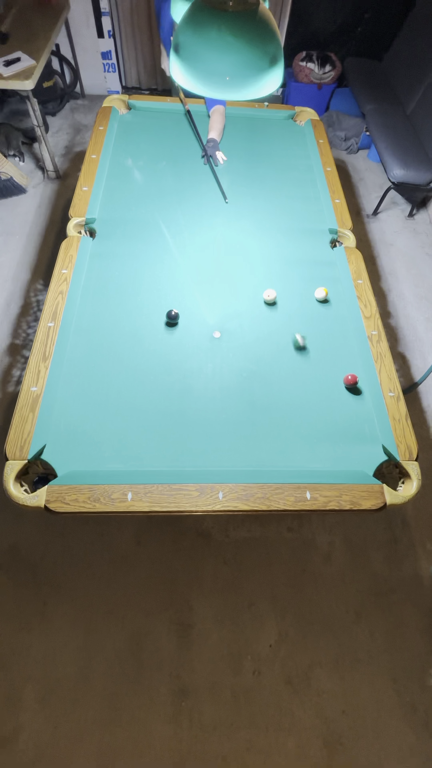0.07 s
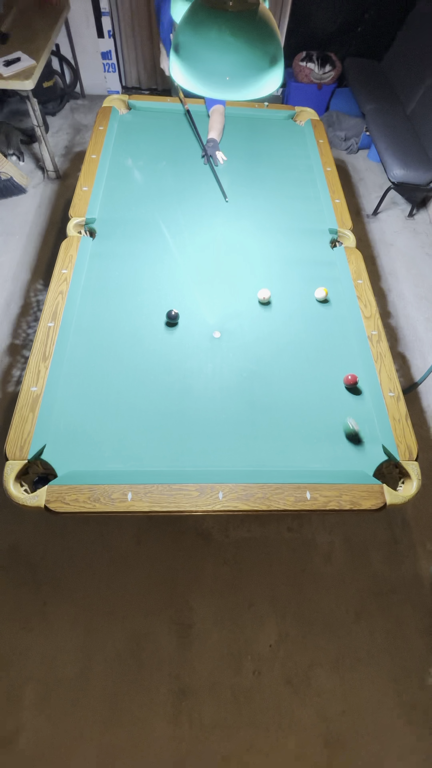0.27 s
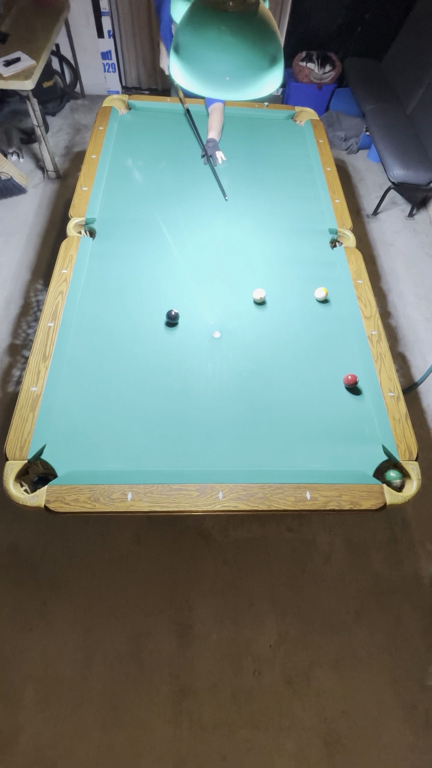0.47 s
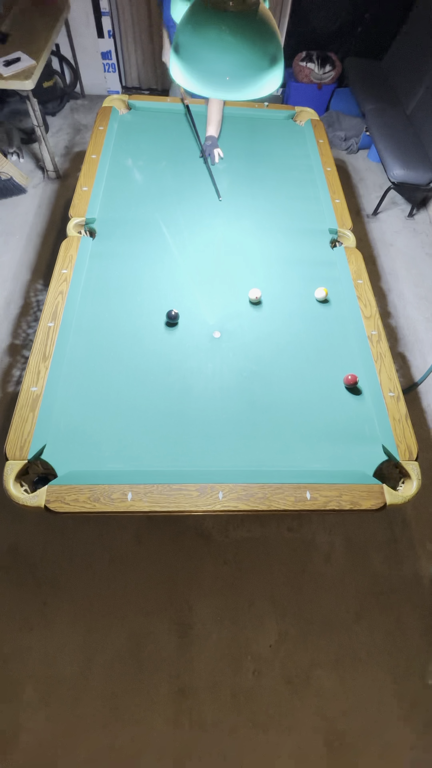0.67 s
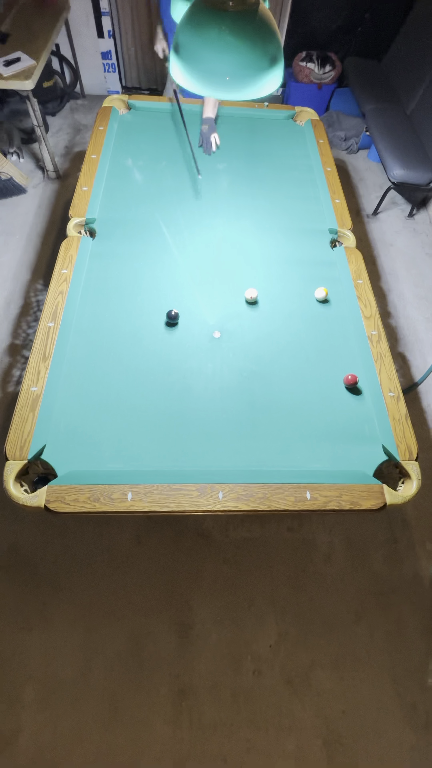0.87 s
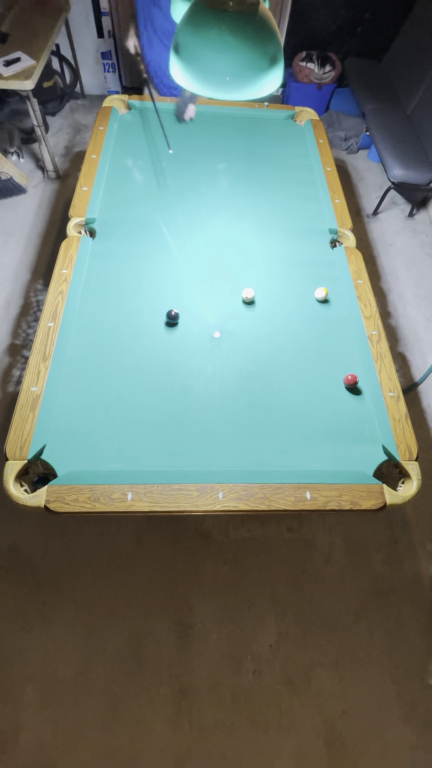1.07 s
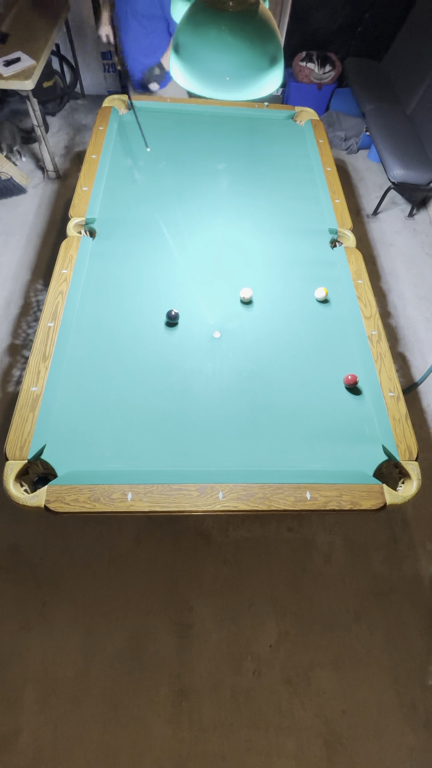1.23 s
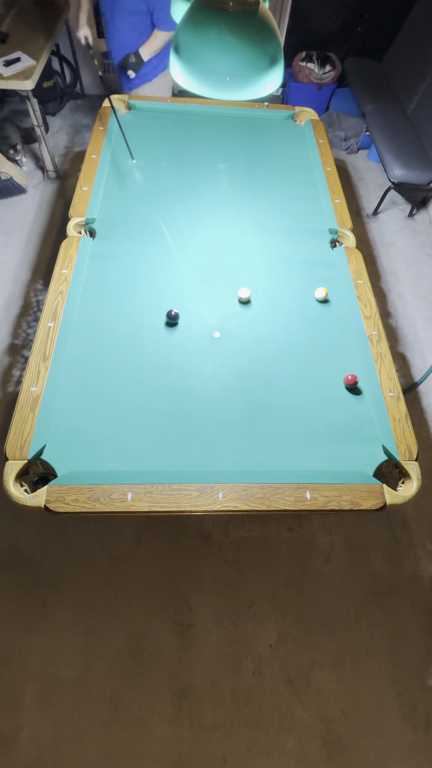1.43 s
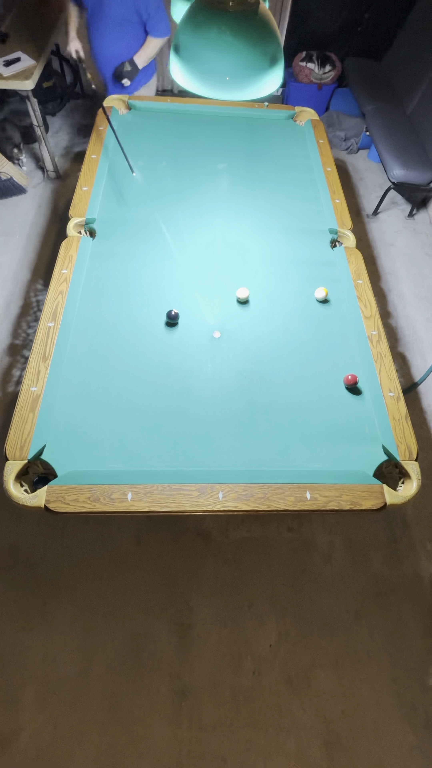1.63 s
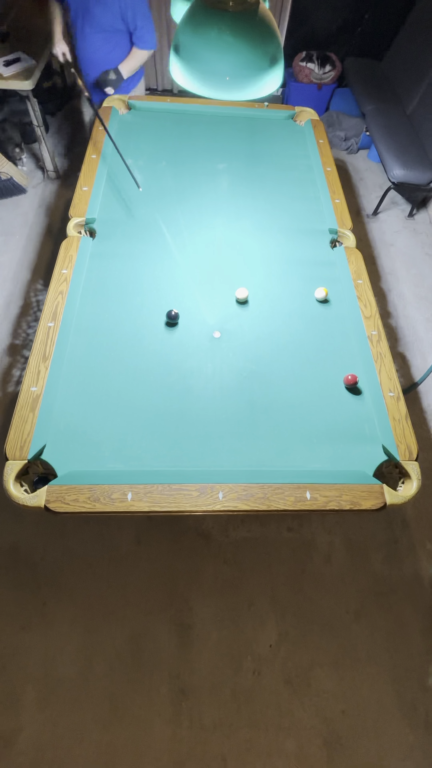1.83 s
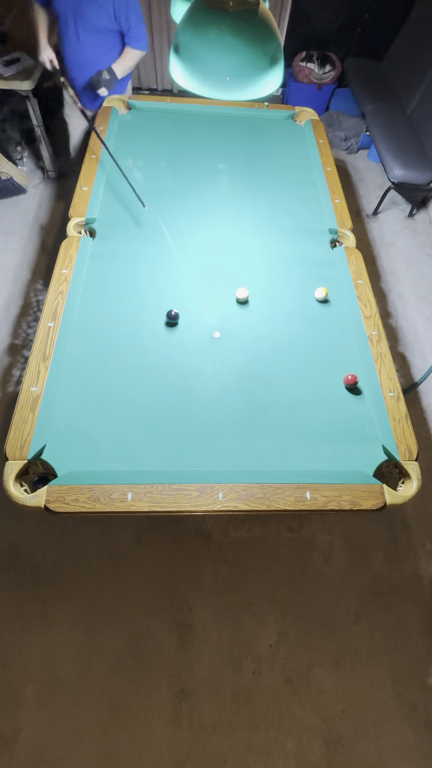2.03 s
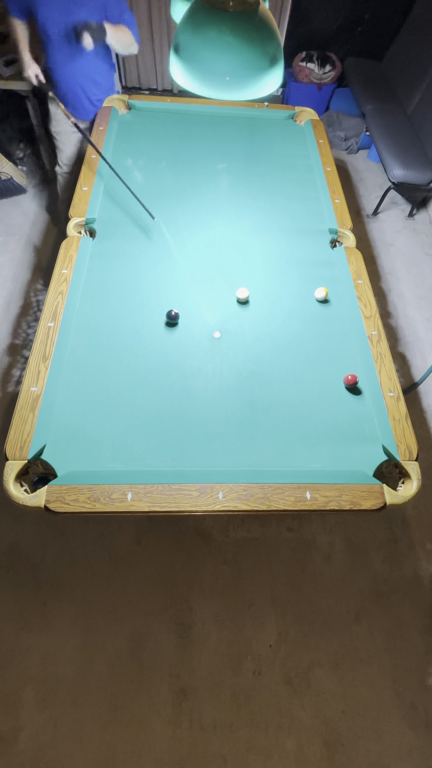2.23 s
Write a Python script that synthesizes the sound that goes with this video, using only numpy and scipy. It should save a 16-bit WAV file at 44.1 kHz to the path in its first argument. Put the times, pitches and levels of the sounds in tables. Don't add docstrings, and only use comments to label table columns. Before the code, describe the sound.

A pool shot in a small hard room, heard from a phone above the table: a loud sharp ball click, brief roll on cloth, hollow pocket knocks, lighter ball taps, booming table frame, then faint footfalls and scuffs.

```python
import sys
import numpy as np
from scipy import signal
from scipy.fft import rfft, irfft
from scipy.io import wavfile
from scipy.ndimage import uniform_filter1d

SR = 44100
rng = np.random.default_rng(int(sys.argv[2]) if len(sys.argv) > 2 else 0)


def decibels_to_gain(level_db):
    exponent = np.asarray(level_db, float) / 20
    return 10 ** exponent


def transcribe(signal):
    frames = np.atleast_2d(signal).T
    limited = np.clip(frames, -1, 1)
    pcm = np.round(limited * 32767).astype(np.int16)
    wavfile.write(sys.argv[1], SR, pcm)


N = 101385
T = np.arange(N) / SR

# pitch in Hz, level in dB per Hz.
HUM = [(15, 7), (25, -20), (80, -0.5), (285, -15), (317, -15.5), (531, -22), (575, -21.5), (3820, -30),
       (16000, -42)]
# pitch in Hz, width in Hz, level in dB.
WHINES = [(3531, 1400, -80.5), (8300, 380, -80.5), (11040, 800, -79)]
# pitch in Hz, width in Hz, level in dB.
FRAME_MODES = [(62.8, 8.46, 6), (84, 5.7, 1.8), (118.4, 64, -2), (139.5, 20.9, -11), (42.48, 11, -17)]
# time in seconds, level in dB.
RUMBLE_LEVEL = [(.0, -44.5), (.12, -50), (.32, -63.5), (.5, -47.5), (1.05, -52.5), (1.25, -63.5),
                (1.4, -56.5), (1.8, -68.5), (2.3, -67.5)]
# time in seconds, level in dB.
ROLL_LEVEL = [(.0, -71), (.07, -51), (.16, -54), (.21, -71.5), (.26, -68), (.3, -58), (.38, -54.5),
              (.42, -66.5), (2.3, -121)]
# pitch in Hz, width in Hz, level in dB, start in seconds, end in seconds.
BED_MODES = [(382.5, 20, 5, .1, 0.24), (475, 40, -1.5, 0.12, 0.25), (690, 40, -3, .06, 0.157),
             (421, 35, 4.5, 0.28, .45), (744, 100, -5, 0.295, 0.38)]
# start in seconds, level in dB, centre in Hz, width as a share of the centre, treble in dB.
CLICKS = [
    (.0002, -24.5, 2140, 0.96, -31),
    (.0053, -5.5, 2295, 1.46, -26),
    (0.3868, -36, 2360, 2.2, -5.5),
    (0.461, -29.5, 2960, 0.63, 7.5),
    (0.673, -45.5, 2630, 2.1, -17),
    (0.7222, -22.5, 2870, 0.83, -2.5),
    (0.8699, -24.5, 2967, 0.54, -6.5),
    (1.274, -45, 2585, 1, 1),
]
# start in seconds, level in dB, brightest pitch in Hz, ring as a share of the decay,
# spread in octaves.
KNOCKS = [(.006, -29.5, 300, 1.2, 1.46), (.388, -24, 990, 0.18, 0.48), (.391, -24, 500, 0.18, 0.56),
          (.404, -24.5, 600, 0.47, 0.58), (0.4624, -20, 980, 0.25, 0.34), (.472, -32.5, 576, 0.22, 0.61),
          (0.674, -44.5, 820, 1.4, 1.9), (.723, -35, 634, 0.37, 1.2), (.871, -43, 587, 0.44, 0.3),
          (0.951, -52, 500, 0.38, 0.63), (1.054, -46.5, 540, 0.21, 0.62), (1.078, -56, 835, 0.28, 0.65),
          (1.275, -53.5, 900, 0.39, 1.6), (1.329, -57, 500, 0.63, 0.82), (1.615, -48.5, 1020, 0.27, 0.45),
          (1.648, -46.5, 600, 0.23, 1.06), (2.275, -42, 1200, 0.41, 1.26)]
# pitch in Hz, level in dB, time to fall 60 dB in seconds.
WOOD_MODES = [(173, -1.5, 0.17), (258, 0.5, 0.11), (345, -4, 0.1), (436.5, -7, 0.13), (522, -7.5, .13),
              (579, -1, 0.073), (690, 1.5, 0.065), (795, -5.5, .1), (953, -4, 0.047), (1074, -4, .06),
              (1436, -4.5, 0.062), (1800, -11.5, .05), (2050, -19.5, .04)]
# centre in seconds, level in dB, pitch in Hz, length in seconds.
THUDS = [(0.051, -44.5, 95.2, .07), (0.122, -50, 66.8, .12), (0.186, -42.5, 84.3, .11),
         (0.256, -51, 84, .1), (0.408, -45.5, 64, 0.093), (0.484, -37.5, 94.5, 0.065),
         (0.54, -30.5, 84, 0.091), (0.654, -37.5, 65.3, .12), (0.725, -46, 76, 0.12), (0.81, -36, 92, .09),
         (0.844, -34.5, 62.3, .12), (0.966, -34, 82.7, .09), (1.042, -40, 86, 0.0753),
         (1.081, -40, 73, .09), (1.173, -52.5, 85, 0.089), (1.298, -47.5, 84, .08),
         (1.368, -43.5, 73.4, .09), (1.465, -51, 84.3, .08), (1.65, -55.5, 69, .14),
         (.08, -43.5, 186.2, .12), (0.598, -52.5, 140, 0.095)]
# centre in seconds, level in dB, pitch in Hz, length in seconds, glide as a share of pitch.
CLUNKS = [(.393, -20.5, 392, 0.011, -0.67), (.398, -24.5, 530, .016, -0.12), (.4, -28, 225, 0.011, -0.48),
          (.417, -27, 168.3, 0.049, -0.25), (.412, -30, 245, 0.04, -0.23), (.42, -28.5, 440.4, 0.047, 0.28),
          (.45, -25.5, 184.4, 0.021, .01), (.466, -36, 900, 0.03, 0.46), (.478, -35, 500, 0.044, .1),
          (.965, -43.5, 293, 0.02, 0.24), (1.067, -49.5, 302, 0.031, .05), (2.283, -45, 345, 0.022, -0.053),
          (2.28, -48.5, 690, .016, -0.13)]
# time in seconds, level in dB.
SHIFT_LEVEL = [(.0, -102.5), (.44, -67), (.47, -66), (.6, -67.5), (.98, -64.5), (1.03, -74.5), (1.59, -81),
               (1.62, -71.5), (1.68, -73.5), (1.71, -72), (1.85, -68.5), (1.89, -84.5), (2.3, -73.5)]
# start in seconds, length in seconds, level in dB, first pitch in Hz, last pitch in Hz, width in Hz.
SCUFFS = [
    (1.6, 0.1, -62, 1150, 650, 700),
    (1.634, 0.064, -68.5, 1900, 1640, 610),
    (1.751, 0.68, -71.5, 298, 426, 300),
]
# delay in ms, left level in dB, right level in dB.
STRIKE_ECHOES = [(1.1, -0.5, -2), (1.896, -12.5, -13), (3.45, -13, -6), (7.536, -16, -4.5),
                 (8.54, -10.5, -15), (9.435, -8, -7), (12.54, -10, -10.5), (20.12, -9.5, -6),
                 (21.94, -9, -14), (22.6, -7, -8), (25.1, -7, -15.5), (29.14, -18.5, -9.5)]
# delay in ms, left level in dB, right level in dB.
CORNER_ECHOES = [(1.9, -11, -3), (3.1, -6.5, -13), (4.2, -8, -12.5), (5.2, -15.5, -1.5), (8.3, -11, -11),
                 (12, -13, -12.5), (14.5, -13, -9.5)]
# pitch in Hz, time to fall 60 dB in seconds, level in dB.
ROOM = [(200, 0.44, -0.5), (500, 0.16, 0.5), (1200, 0.19, -5), (2800, 0.29, 1), (6000, 0.25, 10.5),
        (11720, 0.22, 3.5)]

DIRECT_DB, STRIKE_TAIL_DB, CORNER_TAIL_DB, WOOD_TAIL_DB = 2, -29, -31, -23.5
STRIKE_PAN_DB, POCKET_PAN_DB, KNOCK_PAN_DB, FRAME_PAN_DB = -1, -1, -2, -3.5
STRIKE_LAG, POCKET_LAG, TAP_LAG = 5, 15, 7


def unit(x):
    return x / np.sqrt(np.mean(x ** 2))


def band(x, hz, width):
    return signal.lfilter(*signal.iirpeak(min(hz, .45 * SR), hz / width, fs=SR), x)


def band_twice(x, hz, width):
    return band(band(x, hz, width), hz, width)


def humming(modes):
    return sum(decibels_to_gain(db) * unit(band_twice(rng.standard_normal(N), hz, width)) for hz, width, db in modes)


def grit(length, wide, shared):
    return wide * rng.standard_normal((2, length)) + shared * rng.standard_normal(length)


def curve(table):
    return decibels_to_gain(np.interp(T, *np.array(table).T))


def pan(db):
    return decibels_to_gain(np.array([[db], [-db]]) / 2)


def add(out, at, x):
    i = max(int(at * SR), 0)
    n = min(x.shape[-1], N - i)
    out[:, i:i + n] += x[:, :n]


def push(ms):
    force = np.hanning(max(int(ms * SR / 1000), 1) + 2)
    return force / force.sum()


def ring(modes, share, tilt_db, chance):
    hz, db, t60 = np.array(modes).T[:, :, None]
    t = T[:SR // 2]
    hz = hz * (1 + .02 * chance[:, None])
    decay = decibels_to_gain(-60 * t / (t60 * share))
    return np.sum(decibels_to_gain(db + tilt_db[:, None]) * np.sin(2 * np.pi * hz * t) * decay, axis=0)


def room(tail_db, echoes, lag, shadow_db=0):
    t = T[:SR // 2]
    noise = rng.standard_normal((3, len(t)))
    hz, t60, colour = np.array(ROOM).T
    tail = 0
    for f in 127 * 2. ** np.arange(8):
        alike = np.clip(0.13 + 0.87 / (1 + (f / 350) ** 2), 0, 1)
        mixed = np.sqrt(alike) * noise[0] + np.sqrt(1 - alike) * noise[1:]
        colour_db = np.interp(np.log(f), np.log(hz), colour)
        fall_s = np.interp(np.log(f), np.log(hz), t60)
        tail = tail + band(mixed, f, .7 * f) * decibels_to_gain(colour_db - 60 * t / fall_s)
    response = decibels_to_gain(tail_db) * tail * (1 - np.exp(-t / 0.003))
    response[0, max(lag, 0)] += decibels_to_gain(DIRECT_DB + shadow_db / 2)
    response[1, max(-lag, 0)] += decibels_to_gain(DIRECT_DB - shadow_db / 2)
    for ms, left_db, right_db in echoes:
        response[:, int(ms * SR / 1000)] += decibels_to_gain(np.array([left_db, right_db]))
    return response


def hum():
    f = np.fft.rfftfreq(N, 1 / SR) + 1
    hz, db = np.array(HUM).T
    mid, side = rfft(rng.standard_normal((2, N))) * decibels_to_gain(np.interp(np.log(f), np.log(hz), db))
    side = side * np.minimum(f / 900, 1) * .6 * (f < 6500)
    return decibels_to_gain(-57) * unit(irfft(np.array([mid + side, mid - side]), N)) * pan(-2.2)


def whines():
    return humming(WHINES)


def rumble():
    return pan(FRAME_PAN_DB) * humming(FRAME_MODES) * curve(RUMBLE_LEVEL)


def rolling():
    bed = 0
    for hz, width, db, start, end in BED_MODES:
        under_ball = uniform_filter1d(1. * (T > start) * (T < end), size=1500)
        bed = bed + humming([(hz, width, db)]) * under_ball
    return pan(-2.5) * bed * curve(ROLL_LEVEL)


def clicks():
    out = np.zeros((2, N))
    kick = signal.unit_impulse(600)
    smooth = signal.butter(6, 4900, fs=SR, output="sos")
    treble = band_twice(kick, 5600, 2950) + decibels_to_gain(-12.5) * kick
    for at, db, hz, width, treble_db in CLICKS:
        body = band_twice(band_twice(kick, hz, width * hz), hz, width * hz)
        body = signal.sosfilt(smooth, body)
        skirt = band_twice(kick, 0.62 * hz, 0.51 * hz)
        pulse = body / np.abs(body).max()
        pulse = pulse + decibels_to_gain(-8.5) * skirt / np.abs(skirt).max()
        pulse = pulse + decibels_to_gain(treble_db) * treble / np.abs(treble).max()
        if .001 < at < .2:
            add(out, at + .0002, decibels_to_gain(db - 8.5) * np.array([[1, -0.53]]))
        if at < .2:
            place = room(STRIKE_TAIL_DB, STRIKE_ECHOES, STRIKE_LAG) * pan(STRIKE_PAN_DB)
        else:
            place = room(CORNER_TAIL_DB, CORNER_ECHOES, -TAP_LAG, shadow_db=11) * pan(POCKET_PAN_DB)
        add(out, at, decibels_to_gain(db) * signal.fftconvolve(place, pulse[None], axes=1))
    return out


def knocks():
    out = np.zeros((2, N))
    for at, db, hz, share, spread in KNOCKS:
        chance = rng.standard_normal((2, len(WOOD_MODES)))
        octaves = np.log2(np.array(WOOD_MODES)[:, 0] / hz)
        tilt_db = -6 * (octaves / spread) ** 2 + 1.5 * chance[1]
        knock = np.convolve(ring(WOOD_MODES, share, tilt_db, chance[0]), push(0.17))
        if at > .9:
            knock = knock * (1 - np.exp(-T[:len(knock)] / .003))
        knock = knock / np.abs(knock).max()
        place = room(WOOD_TAIL_DB - 0.5, CORNER_ECHOES, -POCKET_LAG)
        heard = signal.fftconvolve(place, knock[None], axes=1)
        add(out, at, decibels_to_gain(db + 1.0) * pan(KNOCK_PAN_DB) * heard)
    return signal.sosfilt(signal.butter(4, 140, "high", fs=SR, output="sos"), out)


def air():
    t = T[:SR // 3]
    middle = rng.standard_normal(len(t))
    side = 0.48 * rng.standard_normal(len(t)) * np.array([[1], [-1]])
    out = np.zeros((2, N))
    add(out, .007, decibels_to_gain(-53 - 60 * t / 0.342) * unit(band_twice(middle + side, 9100, 8100)))
    return out


def thuds():
    out = np.zeros((2, N))
    for at, db, hz, length in THUDS:
        swell = np.hanning(int(length * SR))
        boom = swell * np.sin(2 * np.pi * hz * T[:len(swell)])
        add(out, at - length / 2, decibels_to_gain(db + 2.5) * boom[None])
    return pan(FRAME_PAN_DB) * out


def clunks():
    out = np.zeros((2, N))
    for at, db, hz, length, glide in CLUNKS:
        swell = np.hanning(int(length * SR))
        t = T[:len(swell)] - length / 2
        tone = np.cos(2 * np.pi * hz * t * (1 + glide * t / length / 2))
        add(out, at - length / 2, decibels_to_gain(db) * (swell * tone)[None])
    out[1] = np.roll(out[1], POCKET_LAG)
    heard = signal.fftconvolve(room(WOOD_TAIL_DB - 8.5, [], 0), out, axes=1)[:, :N]
    return pan(KNOCK_PAN_DB) * heard / decibels_to_gain(DIRECT_DB)


def shifting():
    rough = grit(N, 0.7, 1)
    rub = unit(band(rough, 1100, 2600)) + decibels_to_gain(-6.0) * unit(band(rough, 6000, 11680))
    return rub * curve(SHIFT_LEVEL)


def scuffs():
    out = np.zeros((2, N))
    for at, length, db, from_hz, to_hz, width in SCUFFS:
        swell = np.hanning(int(length * SR))
        rough = grit(len(swell), 0.45, 1)
        share = np.linspace(0, 1, len(swell))
        rub = np.sqrt(1 - share) * band_twice(rough, from_hz, width)
        rub = rub + np.sqrt(share) * band_twice(rough, to_hz, width)
        add(out, at, decibels_to_gain(db) * unit(rub) * np.sqrt(swell) * pan(-1.4))
    return out


def scene():
    background = hum() + whines() + rumble()
    shot = rolling() + clicks() + knocks() + air() + thuds()
    return background + shot + clunks() + shifting() + scuffs()


def top_cut(x):
    return signal.sosfilt(signal.butter(12, 16750, fs=SR, output="sos"), x)


def record(dry):
    mix = signal.sosfilt(signal.butter(2, 33, "high", fs=SR, output="sos"), dry)
    mix = signal.sosfilt(signal.ellip(8, .3, 60, 15800, fs=SR, output="sos"), mix)
    return top_cut(mix)


dry = scene()
out = record(dry)
transcribe(out)
```